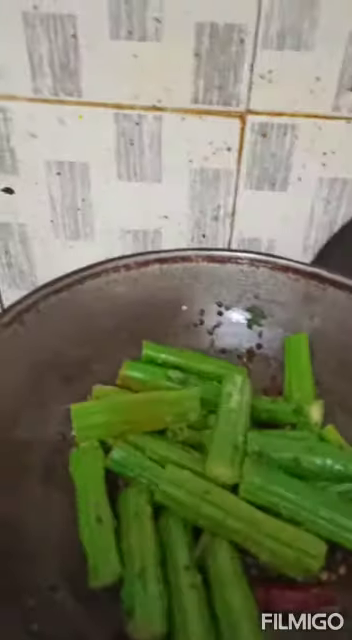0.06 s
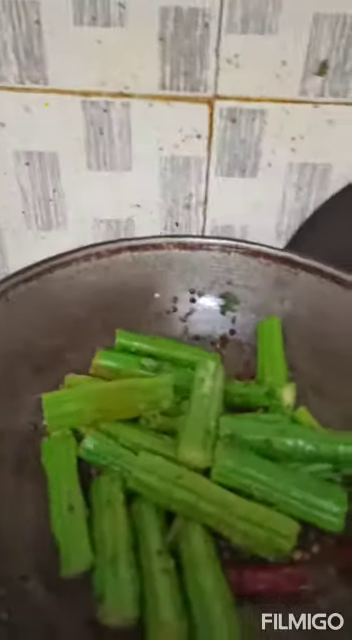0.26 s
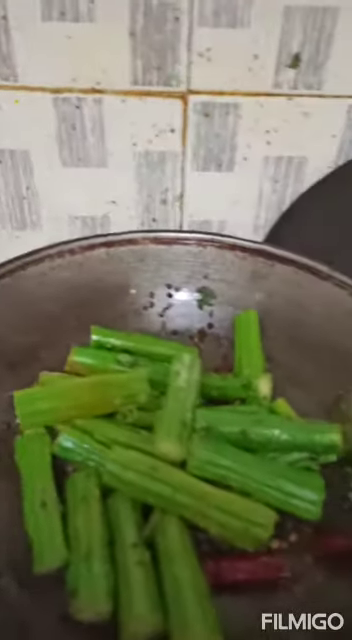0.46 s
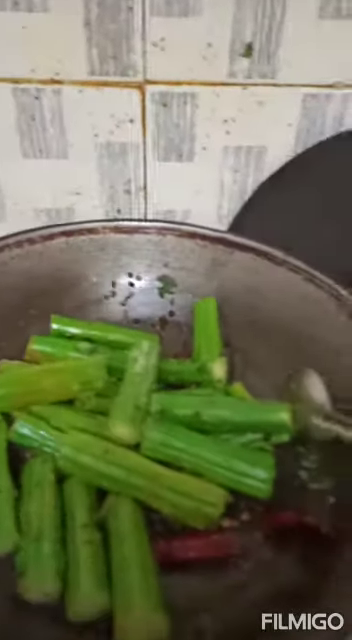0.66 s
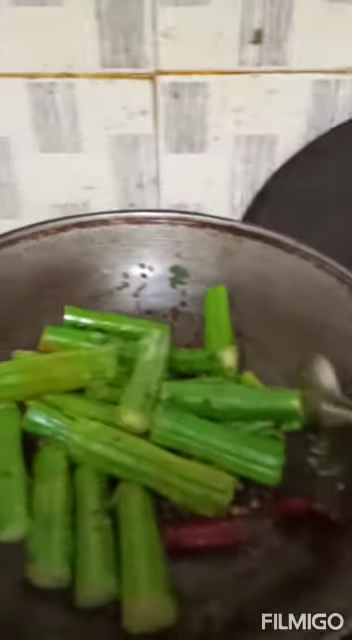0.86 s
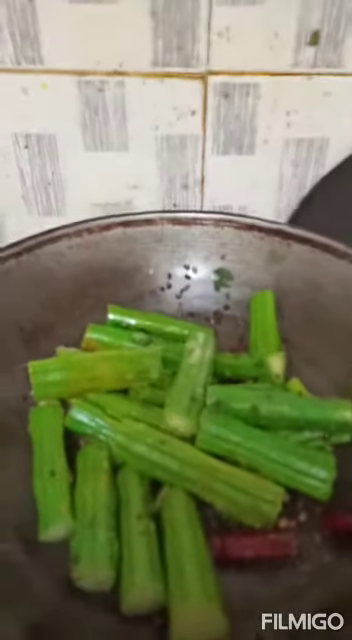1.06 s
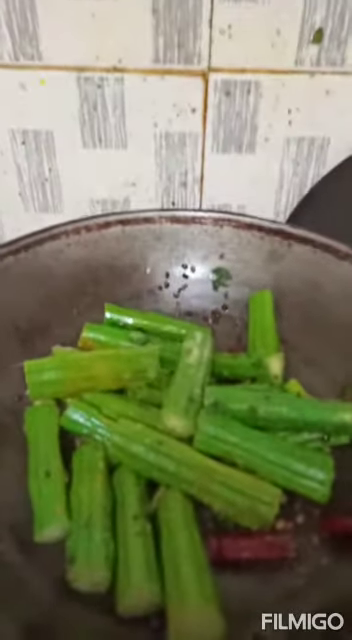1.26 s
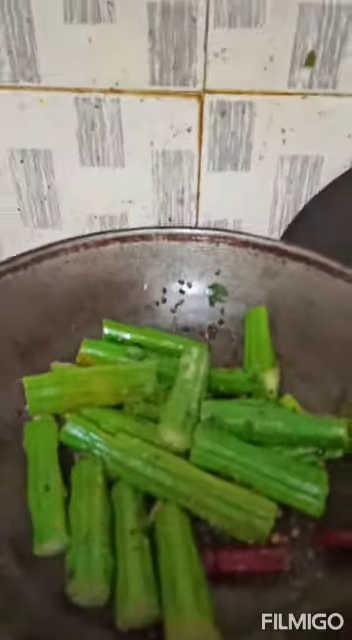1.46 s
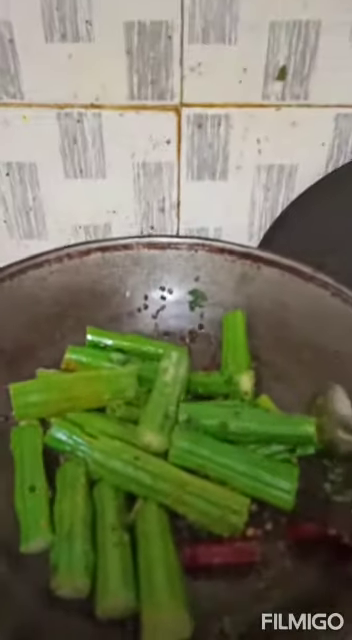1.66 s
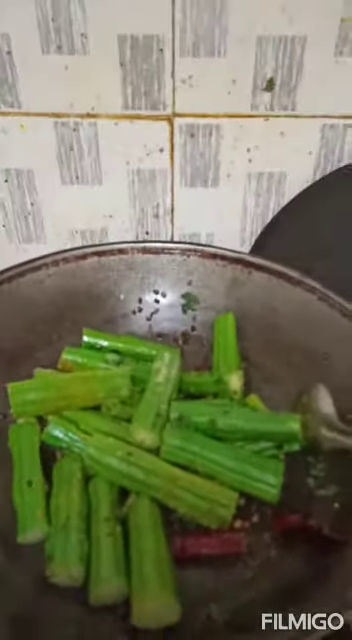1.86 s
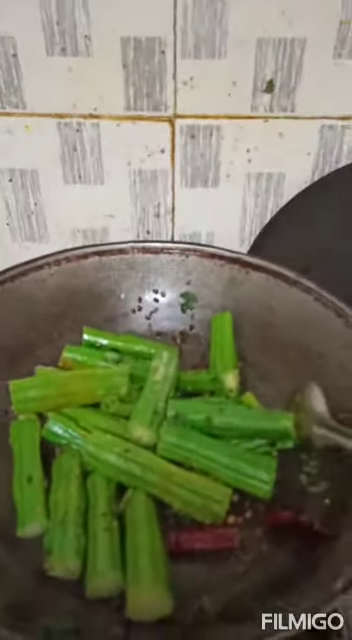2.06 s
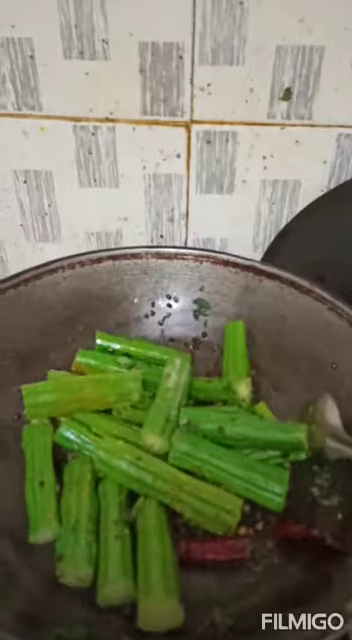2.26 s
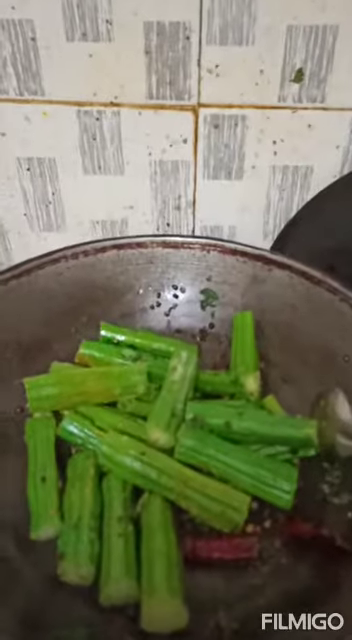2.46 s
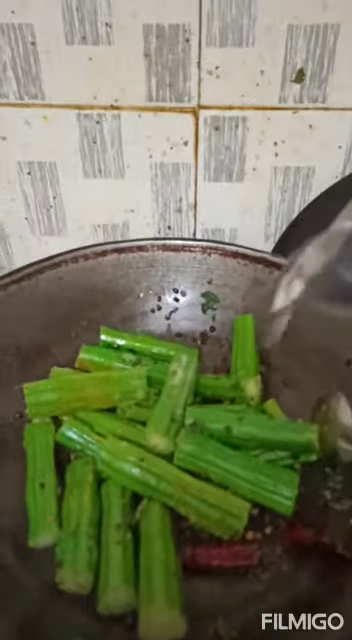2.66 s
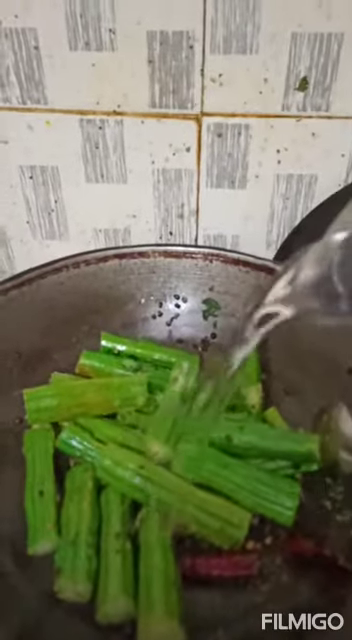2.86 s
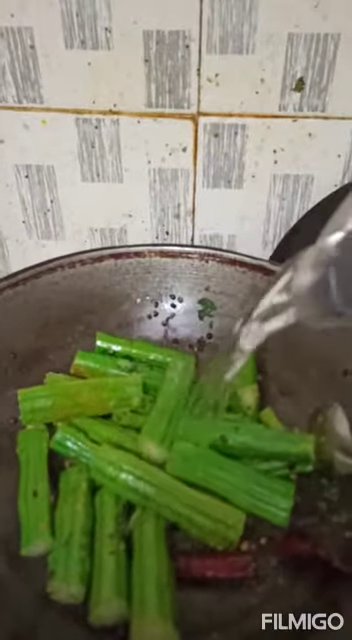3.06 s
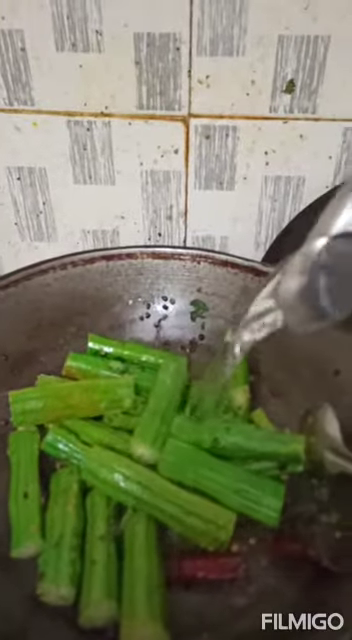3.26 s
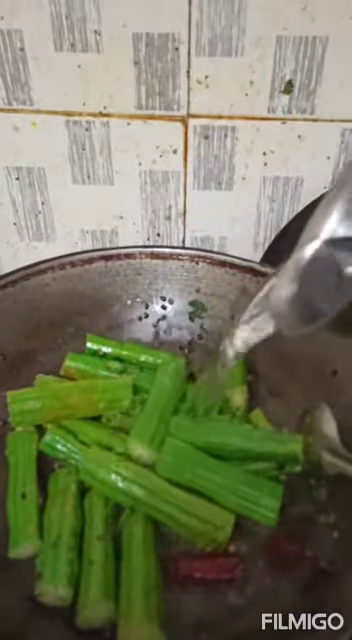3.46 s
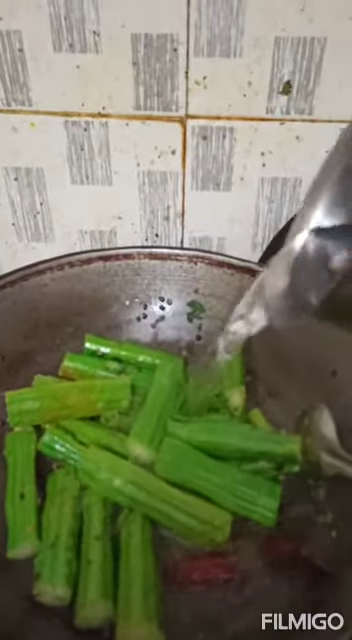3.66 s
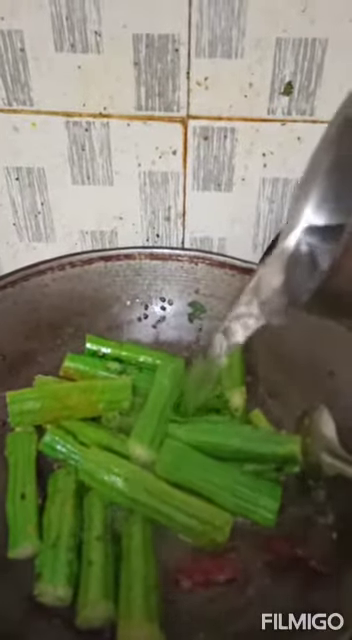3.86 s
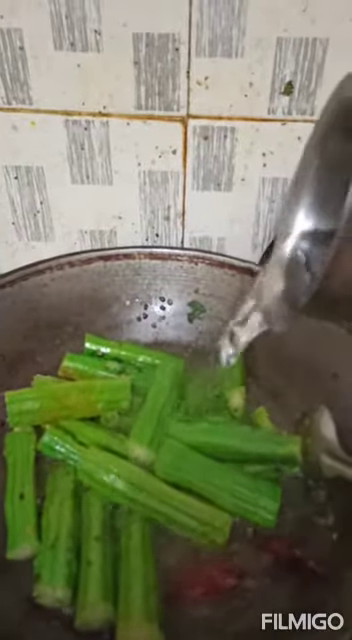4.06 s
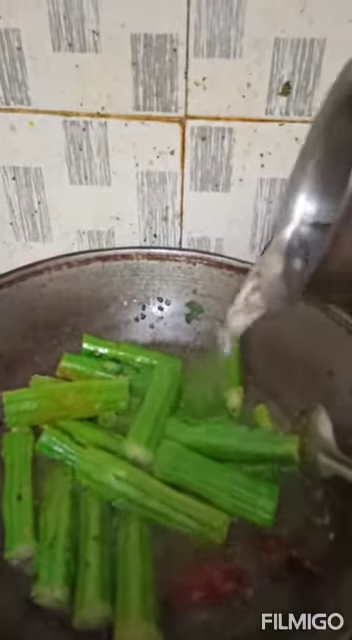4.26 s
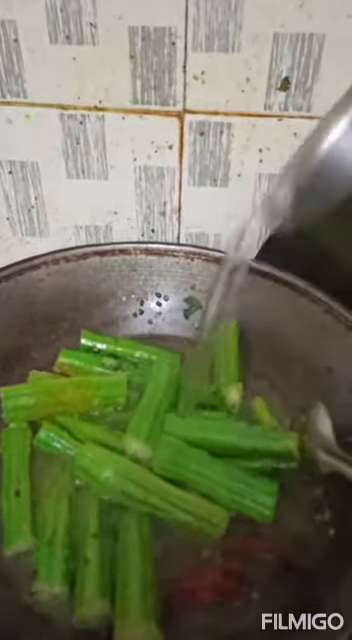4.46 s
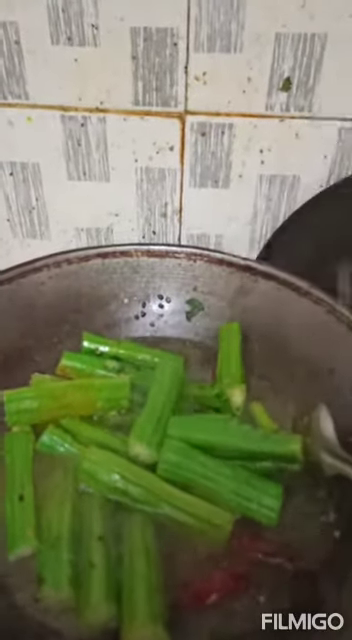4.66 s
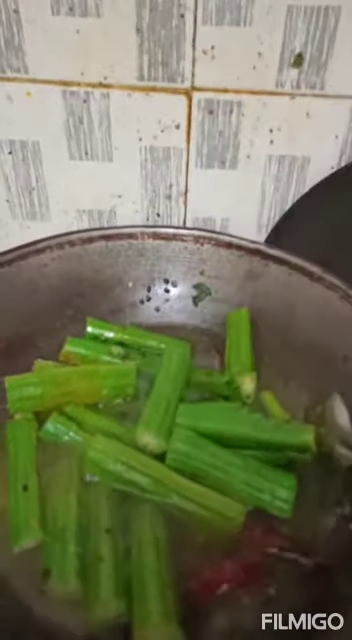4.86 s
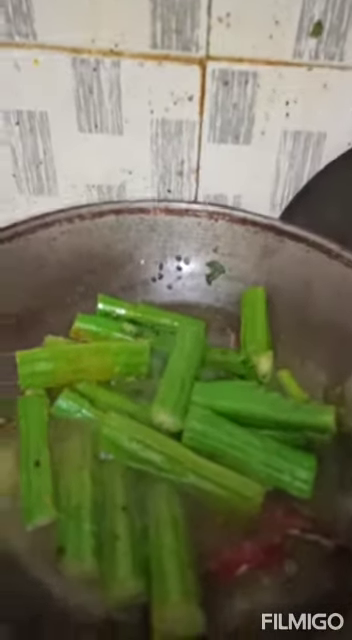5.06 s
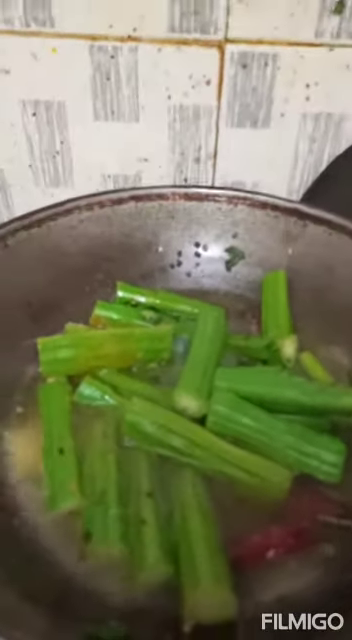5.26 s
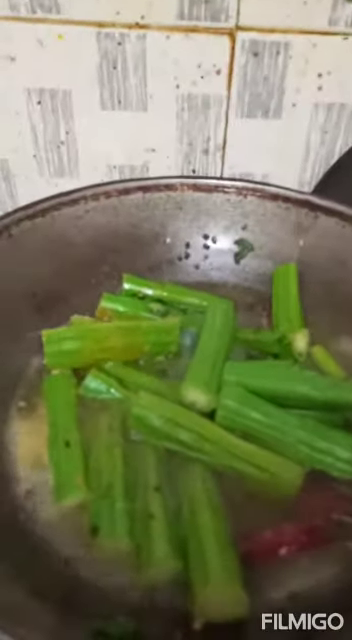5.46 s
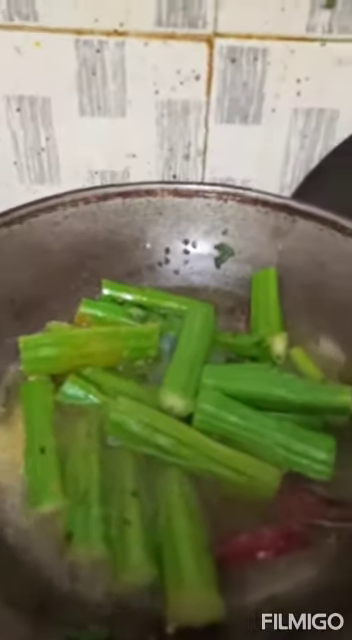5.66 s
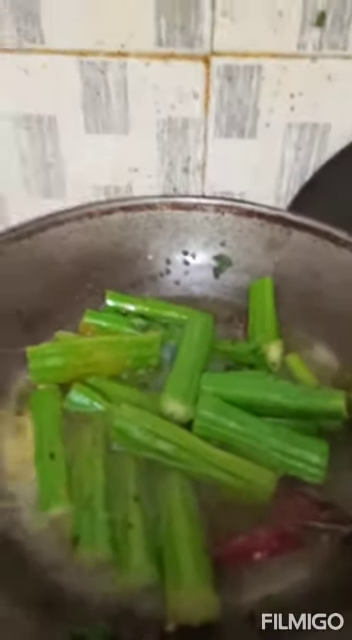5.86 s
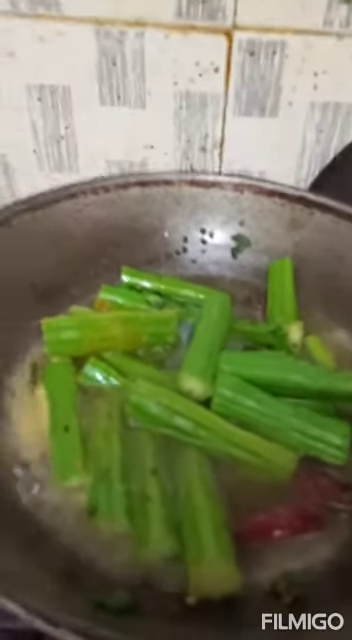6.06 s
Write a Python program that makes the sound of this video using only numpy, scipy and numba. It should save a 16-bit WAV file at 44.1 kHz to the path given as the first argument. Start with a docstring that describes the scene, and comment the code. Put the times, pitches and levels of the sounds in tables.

```python
"""A kitchen: vegetable pieces fry in hot oil in a steel pan, close to a hand-held phone.
Frying is random bursts, cracks and ringing chirps, with lone spits on top. Water is poured in: steam
squeals and hisses (noise on a falling carrier), then it simmers (bubbles, and low modes of the pan).
The jug is put down with a knock and a bounce (decaying modes and scrapes). Behind lie a filtered-noise
rumble and a low drone that swells near the start."""
import sys
import numpy as np
from scipy import signal
from scipy.fft import rfft, irfft, next_fast_len
from scipy.io import wavfile
from scipy.ndimage import uniform_filter1d
from numba import njit

SR = 44100
rng = np.random.default_rng(int(sys.argv[2]) if len(sys.argv) > 2 else 0)


def log_audio(samples):
    """Write samples as a 16-bit WAV file to the path given in sys.argv[1]."""
    # one column per channel
    frames = np.atleast_2d(samples).T
    # limit to full scale, then quantise
    limited = np.clip(frames, -1, 1)
    pcm = np.round(limited * 32767).astype(np.int16)
    wavfile.write(sys.argv[1], SR, pcm)


N = 269926
SPAN = next_fast_len(N)  # transform length in samples


def frying():
    """Tiny steam bursts and sharp cracks flare in patches and ring the pan wall; each band flickers alone."""
    # frying over time: t/s, crackle level/dB, gain of 2.2-4.75 kHz/dB, gain above 10 kHz/dB
    fry_moves = [(0, -26.5, -1, 5), (.17, -28.5, 0.5, 5), (.5, -28, -0.5, 5), (.85, -28, 0, 5),
                 (1.02, -28.5, -1, 5), (1.3, -28, -1, 5.5), (1.6, -28, -1.5, 4), (1.72, -27.5, -1.5, 4),
                 (2.05, -29.5, -1, 6), (2.3, -29, -1, 4), (2.4, -31, -1, 6), (2.55, -26.5, -2, 3),
                 (2.72, -32, 0, 6), (2.85, -29, -1, 6), (3.05, -27.5, -1.5, 3.5), (3.14, -24.5, -0.5, 3),
                 (3.22, -21, -1.5, 3), (3.4, -18, -1.5, 2.5), (3.65, -19, 1, 2.5), (3.95, -21, 1, 1),
                 (4.02, -18.5, -2, -1.5), (4.14, -22, -1, 1), (4.24, -22.5, -0.5, 2.5), (4.33, -22.5, 1, 3),
                 (4.5, -24.5, 0, 0.5), (4.66, -27.5, 2, 1), (5.3, -27.5, 1.5, 2), (5.7, -29.5, 2, 2),
                 (6.12, -30.5, 2, 3.5)]
    # tone of the crackle: f/Hz, gain/dB
    crackle_tone = [(300, -50.5), (800, -12), (1500, -7), (2200, -6.5), (3000, 0.5), (4600, 1),
                    (4900, -4.5), (6000, -3), (6300, 3.5), (7600, 3), (7750, 0), (8400, 2.5), (12000, -12),
                    (15500, -11.5)]
    # high modes of the pan wall: f/Hz, width/Hz, level/dB
    wall_modes = [(893, 68, -6), (1260, 80, -6.5), (1698, 65, -2), (1870, 65, -2), (2138, 60, -2),
                  (2346, 45, 1), (2475, 40, -2), (2611, 50, -2.5), (3100, 70, -5), (3622, 60, -3),
                  (7640, 120, -2)]
    # the low crackle starts to strengthen, and takes this long to reach its full gain
    strengthen_s, full_s = 3.6, 1.8
    low_db, wet_low_db = -1, 4  # lowest band: gain in bare oil, and what it gains under water

    water = ramp(strengthen_s, full_s)
    fry_db, middle_db, top_db = curves(fry_moves)
    cracks = level(pops(per_s=450., spread_db=1.8), -8)
    bursts = level(pops(per_s=11000., spread_db=2.0), 0)
    fizz = bubbles(count=12000, lo_hz=1515.0, hi_hz=9060.0, cycles=21.8, glide=0.0337, spread_db=-0.5)
    wall = sum(undb(db) * resonance(bursts, hz, width) for hz, width, db in wall_modes)
    flare_db = .7 * walk(70)
    rain = (bursts + cracks + wall + undb(-8.5) * fizz) * undb(flare_db)

    spectrum = rfft(level(colour(rain, crackle_tone), 0), SPAN)
    hz = np.fft.rfftfreq(SPAN, 1 / SR)
    edges = [0, 2200, 3400, 4750, 6100, 10000, SR]  # Hz
    shifts = [low_db + wet_low_db * water, middle_db, middle_db, 0, 0, top_db]
    out = 0
    for lo, hi, shift_db in zip(edges, edges[1:], shifts):
        band = irfft(spectrum * ((hz >= lo) & (hz < hi)), SPAN)[:, :N]
        flicker_db = 0.55 * walk(45) + 0.17 * walk(4.6)
        out = out + band * undb(shift_db + flicker_db)
    return out * undb(fry_db + 0.25 * walk(14))


def spits():
    """Lone drops of water explode in the oil: each is a crack of noise with a short pitched ring."""
    # loudest spits: t/s, level/dB, left minus right/dB, ring f/Hz
    spit_hits = [(0.158, -11, -5, 7600), (0.266, -17, -2.0, 7620), (0.324, -14, 3, 3800),
                 (0.4624, -12.5, -1.5, 4160), (0.6524, -14, -2.5, 6440), (0.6715, -12, -1.0, 7620),
                 (0.7074, -16, -2.0, 7170), (0.7584, -21, -1.5, 3580), (0.7962, -17, -2.5, 6570),
                 (0.809, -12, -1.0, 7080), (0.871, -15, -2.0, 8350), (1.0124, -17, -2.5, 7510),
                 (1.0944, -24, -2.0, 6560), (1.1517, -13, 4, 3600), (1.2362, -20, -1.5, 7600),
                 (1.3294, -24, -3.0, 8300), (1.4514, -18, -1.5, 7510), (1.6186, -15, -1.5, 6330),
                 (1.7024, -16, -2.0, 3670), (1.8074, -21, -3.0, 8070), (1.9214, -21, -2.5, 7630),
                 (2.2814, -14, -1.5, 7490), (2.471, -15.5, -1.0, 3870), (2.555, -12, 0.5, 7440),
                 (2.58, -18, -2.0, 8310), (2.7904, -15.5, -1.0, 4060), (2.8005, -12, -1.0, 6690),
                 (2.859, -18, -2.0, 6840), (2.9253, -11, -1.0, 7540), (2.968, -11, -2.5, 7170),
                 (3.3263, -8, 9, 6230), (3.535, -9, -1.5, 7600), (3.6792, -8, -0.5, 7420),
                 (3.7971, -4, 0.0, 3800), (3.8602, -4, 1, 4370), (4.004, -3, 1, 6250),
                 (4.2517, -12, -2.0, 6140), (4.5124, -16, -1.0, 6580), (4.765, -10.5, -0.5, 4170),
                 (5.2524, -23, -2.0, 6710), (5.332, -11, -2.0, 8200), (5.751, -17, -2.5, 6750),
                 (5.9144, -13.5, -1.5, 7200), (6.0033, -17, -2.5, 2720)]
    t = np.arange(500) / SR
    out = np.zeros((2, N + SR))
    shape = np.exp(-t / 0.0012) * (1 - np.exp(-t / 0.00049))
    for (s, db, pan_db, hz), hiss in zip(spit_hits, rng.standard_normal((len(spit_hits), len(t)))):
        crack = resonance(resonance(hiss, 4800, 7000), 4800, 7000)
        burst = (0.44 * crack + 0.63 * np.sin(2 * np.pi * hz * t)) * shape
        i = int(s * SR)
        out[:, i:i + len(t)] += burst * undb(db + np.array([[pan_db], [-pan_db]]) / 2)
    return out[:, :N]


def boiling():
    """Small bubbles ring in the mid range; large ones collapse on the hot steel and shake its low modes."""
    # boiling over time: t/s, small bubbles/dB, large bubbles on the pan/dB, lowest pan mode/dB
    boil_moves = [(0, -47.5, -63.5, -64), (.7, -51.5, -62, -76), (1.6, -49, -60, -71),
                  (2.9, -50, -61.5, -74), (3.2, -47.5, -56, -65), (3.4, -41, -54.5, -70),
                  (3.62, -34, -51, -64), (3.85, -37.5, -48, -66), (4.0, -37, -48, -69),
                  (4.2, -37, -48, -68), (4.45, -34.5, -46.5, -59), (5.0, -36.5, -46, -56),
                  (5.27, -38, -50, -50.5), (5.4, -37, -47, -66), (5.7, -37.5, -47, -58),
                  (6.12, -40, -49.5, -60.5)]
    # tone of the small bubbles: f/Hz, gain/dB
    bubble_tone = [(300, -28), (500, -10.5), (650, 3), (900, 1), (1300, -3.5), (2000, 1), (3000, -8)]
    # low modes of the pan, lowest first: f/Hz, width/Hz, relative level/dB
    pan_modes = [(165.4, 16, -1.5), (279, 82, -1), (335, 85, -2.5), (393.4, 23, 4.5), (443.6, 5.5, 0.5)]

    small_db, large_db, boom_db = curves(boil_moves)
    froth = level(pops(per_s=2700.0, spread_db=5.0), 0)
    blips = bubbles(count=4000, lo_hz=454.6, hi_hz=2501.0, cycles=15.2, glide=0.0416, spread_db=1.0)
    small = colour((froth + undb(-7.5) * blips) * undb(1.6 * walk(20)), bubble_tone)
    thumps = pops(per_s=440.0, spread_db=0.5) * undb(1.2 * walk(16))
    boom, *large = (undb(db + 1.6 * walk(18)) * level(resonance(thumps, hz, width), 0)
                    for hz, width, db in pan_modes)

    # each layer wavers on its own
    small_db = small_db + .6 * walk(8.3)
    large_db = large_db + 1.5 * walk(14)
    boom_db = boom_db + 2.6 * walk(7.8)
    return (level(small, 0) * undb(small_db) + level(sum(large), 0) * undb(large_db)
            + boom * undb(boom_db))


def glugs():
    """Big bubbles of steam under the vegetables: a soft swell, then a fading low note that rises in pitch."""
    # loudest single bubbles: t/s, level/dB, starting f/Hz, 60 dB decay/s
    glug_notes = [(3.575, -33, 840, 0.14), (4.154, -32, 440, 0.11), (4.369, -35, 396, 0.16),
                  (4.439, -43, 388, 0.15), (4.908, -27, 760, 0.059), (4.93, -35, 387, 0.2),
                  (4.958, -34.5, 400, 0.22), (5.211, -37.5, 388, 0.14)]
    t = np.arange(SR // 4) / SR
    out = np.zeros(N + SR)
    for s, db, hz, t60 in glug_notes:
        i = int(s * SR)
        shape = (1 - np.exp(-t / 0.0045)) * np.exp(-np.log(1000) * t / t60)
        out[i:i + len(t)] += undb(db) * shape * np.sin(2 * np.pi * hz * t * (1 + 0.18 * t))
    return out[:N]


def singing():
    """Steam squeals through a gap as the water lands: a rough band swells fast, sags in pitch and fades."""
    peak_s, peak_db, rise_db_s, fall_db_s = 3.205, -29, 300, 82
    centre_hz, sag_hz_s, width_hz = 2335, 900, 80
    late = np.arange(N) / SR - peak_s
    low = signal.butter(2, width_hz / 2, fs=SR, output="sos")
    rough = signal.sosfilt(low, rng.standard_normal((2, 3, N)))
    phase = 2 * np.pi * (centre_hz * late - sag_hz_s / 2 * np.clip(late, -.1, .3) ** 2)
    # slow noise on two carriers a quarter turn apart makes a narrow band of noise
    squeal = level(rough[0] * np.cos(phase) + rough[1] * np.sin(phase), 0)
    return squeal * undb(peak_db + np.minimum(rise_db_s * late, -fall_db_s * late))


def jug():
    """The base touches the counter repeatedly; each touch scrapes and drives low, middle and high modes."""
    # touches: t/s, strength/dB, then relative to it thud/dB, ring/dB, ping/dB
    touches = [(5.566, -25.5, -6, 7, -14), (5.571, -25.5, 6, 1, -8), (5.577, -28.5, -6, 7.5, 1),
               (5.585, -29, -0.5, 7, 2), (5.603, -39, 2, -3, 12.5), (5.618, -36.5, -9, 8, 1),
               (5.693, -40, 0, 3, -10), (5.718, -31, 2.5, 3, -16), (5.731, -37, 0, 4, -12),
               (5.808, -41, -4, -9, 5), (5.826, -37, 0, -12, -5), (5.858, -41, -2, 2, -12)]
    # modes of the jug: f/Hz, relative level/dB, 60 dB decay/s
    jug_modes = [(161.5, -11.5, 0.17), (262, -15, 0.083), (329, -8.5, 0.16), (370, -9, 0.09),
                 (567, -10, 0.053), (740, -17, 0.067), (805, -11, .06), (873, -0.5, 0.084),
                 (911, -1.5, 0.13), (1007, -7, 0.058), (1030, -12, 0.056), (1141, -3.5, 0.13),
                 (1510, -8, .03), (2318, -2, 0.13), (2327, -0.5, 0.26)]
    contact_s = 0.0013  # time constant of the onset of the modes
    scrape_db, scrape_s = -13, .008  # noise before its decay, relative to strength plus ring; decay time
    lag_s = .0003  # the jug stands to the left: the right port hears it this much later

    t = np.arange(SR // 3) / SR
    out = np.zeros(N + SR)
    hz, mode_db, t60 = np.transpose(jug_modes)[..., None]
    shape = (1 - np.exp(-t / contact_s)) * np.exp(-np.log(1000) * t / t60)
    modes = undb(mode_db) * shape * np.sin(2 * np.pi * hz * t)
    modes = signal.sosfilt(signal.butter(6, 130, "high", fs=SR, output="sos"), modes)
    group = np.digitize(hz[:, 0], [500, 2000])  # 0 thud, 1 ring, 2 ping
    for (s, db, *shares_db), noise in zip(touches, rng.standard_normal((len(touches), len(t)))):
        i = int(s * SR)
        scrape = resonance(resonance(noise, 750, 1000), 750, 1000)
        scrape = level(scrape, scrape_db + shares_db[1]) * np.exp(-t / scrape_s)
        out[i:i + len(t)] += undb(db) * (undb(shares_db)[group] @ modes + scrape)
    pair = np.array([out, np.roll(out, int(lag_s * SR))])
    return pair[:, :N] * undb([[1.5], [-1.5]])


def kitchen():
    """A soft, patchy rumble of filtered noise, and a wavering drone of narrow noise that swells once."""
    # tone of the rumble: f/Hz, gain/dB
    rumble_tone = [(25, -23), (50, -26), (80, -4.5), (110, -5.5), (200, -15), (500, -25), (1000, -39)]
    swell_s, rise_s, hold_s, fall_s, swell_db = 0.22, 0.12, .46, .08, 6.5
    rumble, hum = rng.standard_normal((2, 3, N))
    swell = ramp(swell_s, rise_s) - ramp(swell_s + rise_s + hold_s, fall_s)
    # the drone is steadier during the swell
    drone_db = swell_db * swell + 2 * (1 - .2 * swell) * walk(9.9)
    drone = level(resonance(resonance(hum, 126.0, 26), 126.0, 26), -66) * undb(drone_db)
    patches_db = 3.2 * walk(13)
    return level(colour(rumble, rumble_tone), -67) * undb(patches_db) + drone


def bubbles(count, lo_hz, hi_hz, cycles, glide, spread_db):
    """Three rains of bubbles of scattered sizes: each a sine that dies over some cycles and rises in pitch."""
    when, pitch, chance = rng.random((count, 3)).T
    hz = lo_hz * (hi_hz / lo_hz) ** pitch
    size = undb(np.minimum(-spread_db * np.log(chance), 4 * spread_db)) * hz
    step = 2 * np.pi * hz / SR  # radians a sample
    life = cycles * SR / hz  # samples to fall to 1/e
    total = 3 * N  # the three rains end to end
    start = (when * total).astype(np.int64)
    stop = np.minimum(start + (4 * life).astype(np.int64), total)
    turn = np.exp(1j * step - 1 / life)
    quicken = np.exp(1j * step * glide / life)  # pitch rises by the share glide in one life
    rain = ring_out(start, stop, size + 0j, turn, quicken, total)
    return level(rain.reshape(-1, N), 0)


@njit
def ring_out(start, stop, z, turn, quicken, out_len):
    """Spinning phasors that shrink by turn each sample and turn ever faster."""
    out = np.zeros(out_len)
    for k in range(len(start)):
        now, p = z[k], turn[k]
        for i in range(start[k], stop[k]):
            out[i] += now.imag
            now *= p
            p *= quicken[k]
    return out


def pops(per_s, spread_db):
    """Three unrelated rains of single-sample bursts (shared, left, right) of randomly scattered size."""
    out = np.zeros((3, N))
    at = rng.random(out.shape) < per_s / SR
    size_db = np.minimum(spread_db * rng.exponential(size=at.sum()), 4 * spread_db)
    out[at] = undb(size_db) * rng.standard_normal(at.sum())
    return out


def walk(rate):
    """Random levels held 1 / rate s and slewed twice, with the slow drift taken out; RMS 1."""
    k = int(SR / rate)
    held = np.repeat(rng.standard_normal(N // k + 1), k)
    x = uniform_filter1d(uniform_filter1d(held, k), k)[:N]
    return level(x - uniform_filter1d(x, 4 * k), 0)


def ramp(start_s, length_s):
    """Rises from 0 to 1 in a straight line."""
    return np.clip((np.arange(N) / SR - start_s) / length_s, 0, 1)


def curves(table):
    """Columns of a table as one value per sample."""
    s, *columns = np.transpose(table)
    return [np.interp(np.arange(N) / SR, s, c) for c in columns]


def resonance(x, hz, width):
    """Two-pole band-pass, gain 1 at the centre."""
    return signal.lfilter(*signal.iirpeak(hz, hz / width, fs=SR), x)


def over_hz(table, size):
    """A (Hz, value) table read at every bin of a spectrum, along log frequency."""
    hz, value = np.transpose(table)
    return np.interp(np.log(np.fft.rfftfreq(size, 1 / SR) + 1), np.log(hz), value)


def colour(x, table):
    """Causal filter with the given (Hz, dB) gain, from the folded cepstrum."""
    cep = irfft(over_hz(table, 4096) * np.log(10) / 20)
    # fold the later half onto the earlier: minimum phase
    cep[1:2048] *= 2
    cep[2049:] = 0
    response = irfft(np.exp(rfft(cep)))[None, :2048]
    return signal.oaconvolve(x, response, axes=-1)[..., :N]


def level(x, db):
    """Scales a signal to an RMS level in dB."""
    return x * undb(db) / np.sqrt(np.mean(x ** 2))


def undb(db):
    """Decibels to amplitude."""
    return np.exp(np.asarray(db) * np.log(10) / 20)


def ports(three):
    """Two microphone ports share much of the bass, turned in phase higher up, and hear their own treble."""
    # balance of the ports: f/Hz, left minus right/dB
    port_lean = [(60, 3), (110, -0.5), (200, 2.5), (380, 3), (700, -1.5), (1290, -3.5), (2380, 6),
                 (4400, 0.5), (8120, -3), (15000, 0)]
    # likeness of the ports: f/Hz, share of power common to both [0-1]
    port_alike = [(30, .4), (60, 0.59), (130, 0.74), (290, 0.81), (640, 0.42), (1000, 0.31), (1400, 0.3),
                  (3100, 0.15), (6800, 0.25), (15000, 0.018)]
    # phase of the common part: f/Hz, lead of the left/rad
    port_turn = [(500, 0.5), (800, -0.8), (1300, 0.5), (1800, -4), (2400, -6), (16000, -4.5)]
    both, left, right = rfft(three, SPAN)
    share = np.clip(over_hz(port_alike, SPAN), 0, 1)
    lean = undb(over_hz(port_lean, SPAN) / 2)
    common = np.sqrt(share) * both
    own = np.sqrt(1 - share)
    pair = [lean * (common * np.exp(1j * over_hz(port_turn, SPAN)) + own * left),
            (common + own * right) / lean]
    return irfft(pair, SPAN)[:, :N]


def scene():
    """Sums the layers; the phone drifts, so the spread layers start lower on the left and even out."""
    turning_db = -0.6  # left against right at the start, closing to 0 at the end
    drift = undb(turning_db * (1.0 - ramp(0, N / SR)) * np.array([[.5], [-.5]]))
    spread = ports(frying() + boiling() + singing() + kitchen())
    return drift * spread + spits() + glugs() + jug()


def record(dry):
    """The loudest peaks are rounded, a deep gap opens in the treble near 11 kHz and the top is cut."""
    # treble gap: f/Hz, gain/dB
    treble_gap = [(8450, 2.5), (8600, -5), (9300, -14), (9900, -13.5), (10850, -34.5), (11050, -78),
                  (11450, -68), (11620, 6.5)]
    rounded = np.tanh(1.1 * dry) / 1.1
    top_cut = signal.ellip(14, .3, 90, 15500, fs=SR, output="sos")  # low-pass at 15.5 kHz
    return signal.sosfilt(top_cut, colour(rounded, treble_gap))


dry = scene()
out = record(dry)
log_audio(out)
```